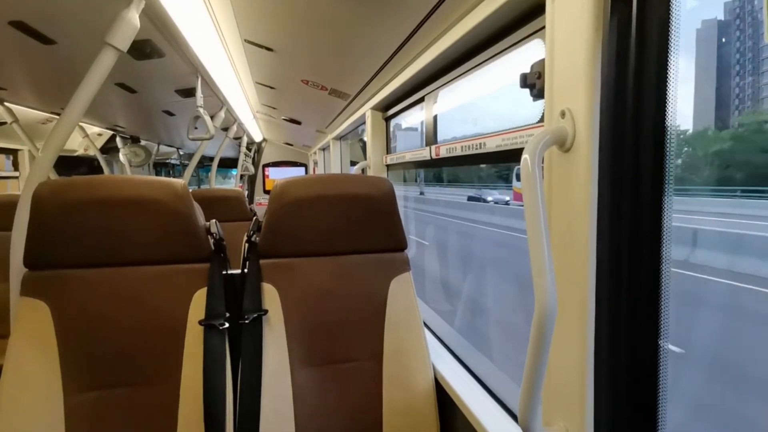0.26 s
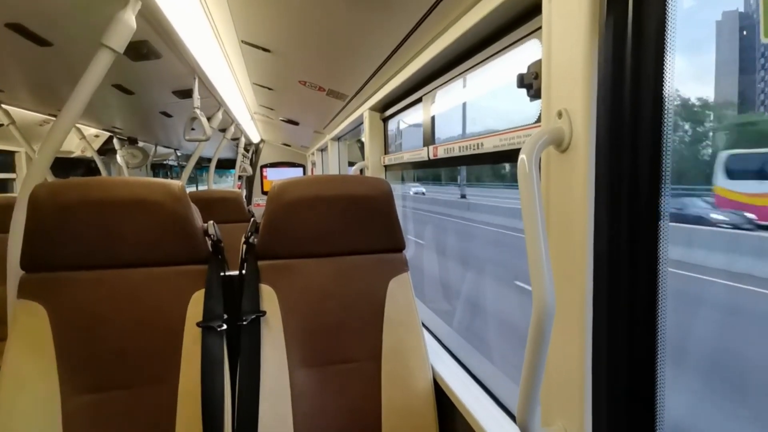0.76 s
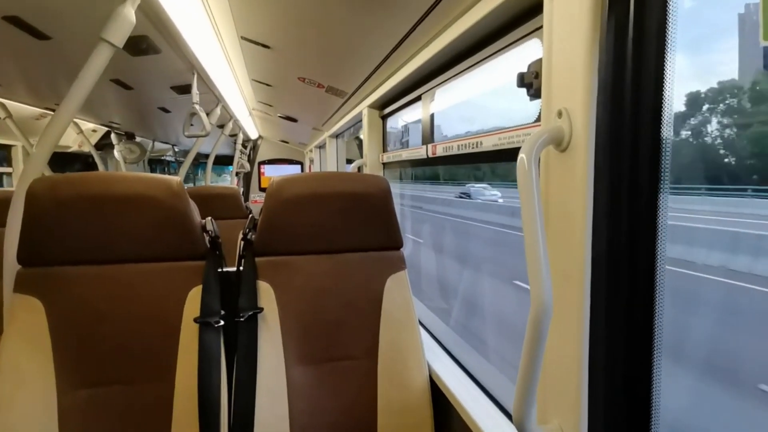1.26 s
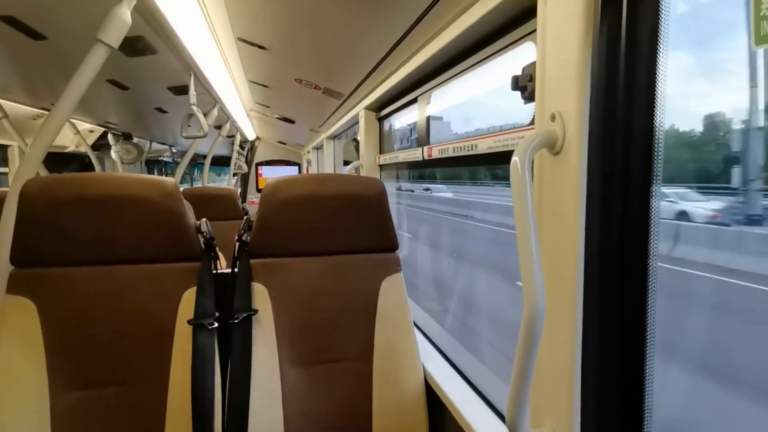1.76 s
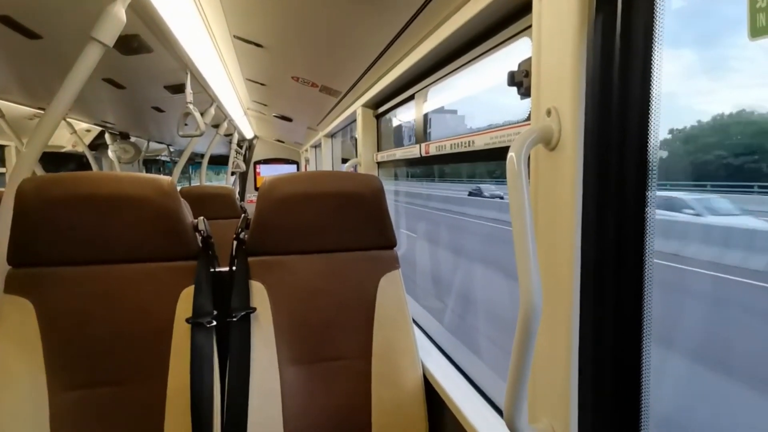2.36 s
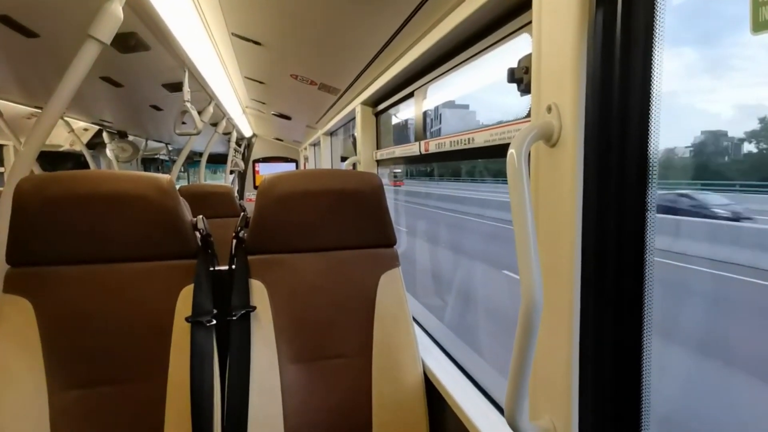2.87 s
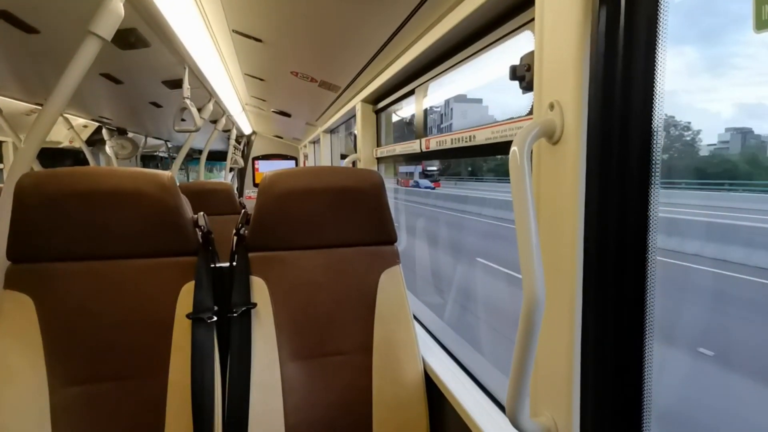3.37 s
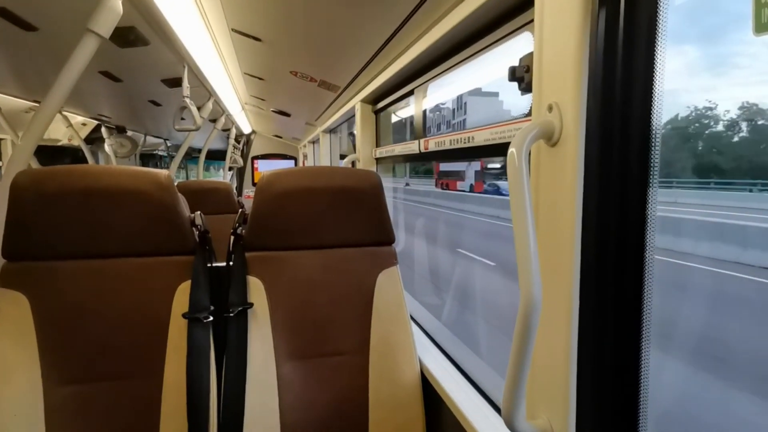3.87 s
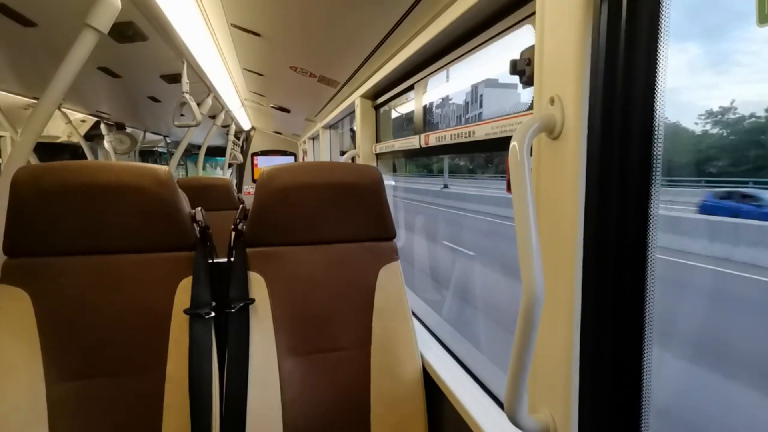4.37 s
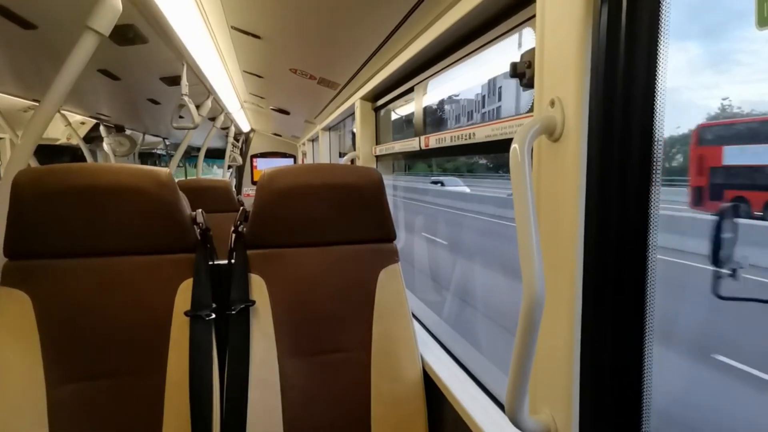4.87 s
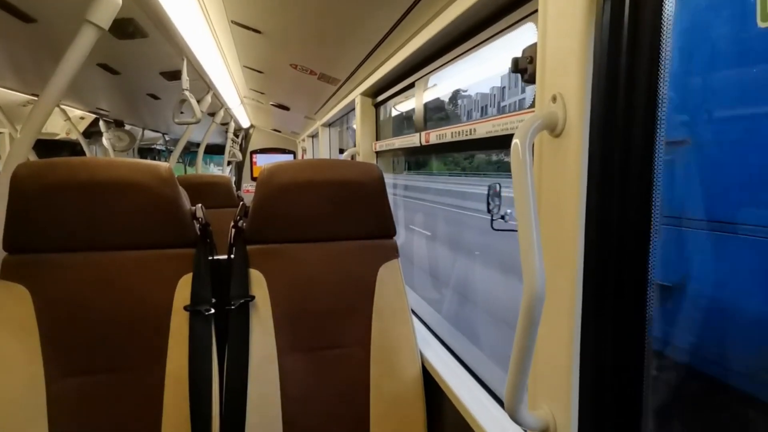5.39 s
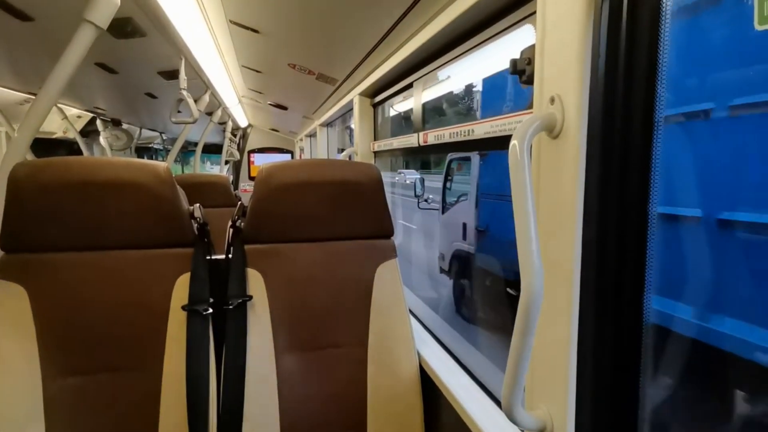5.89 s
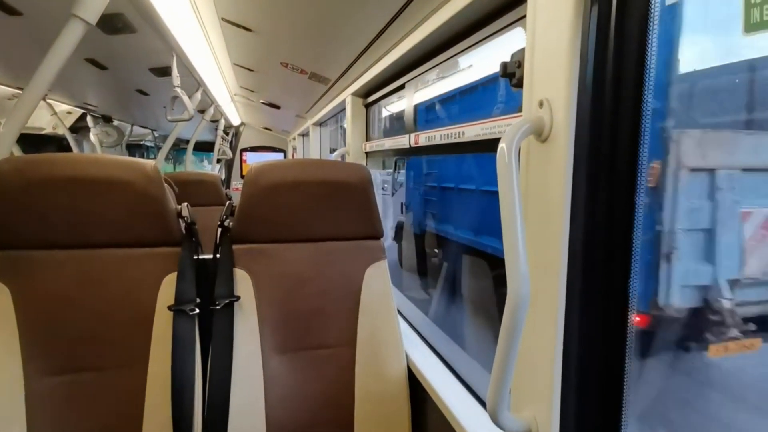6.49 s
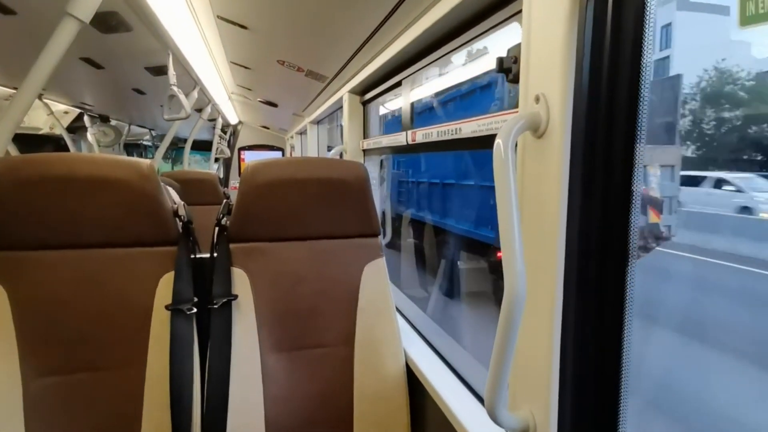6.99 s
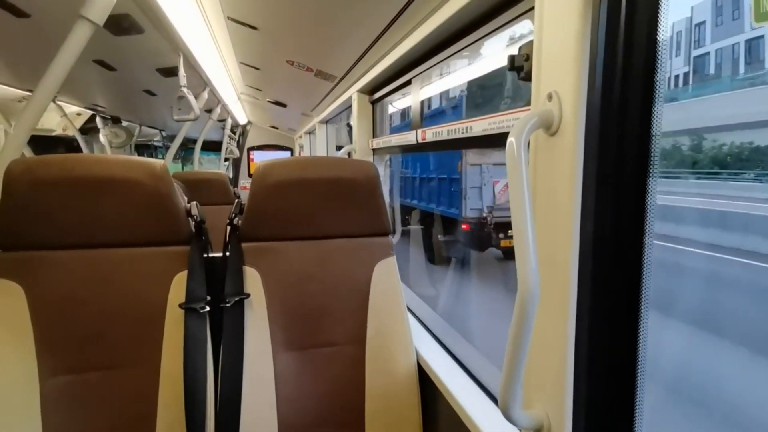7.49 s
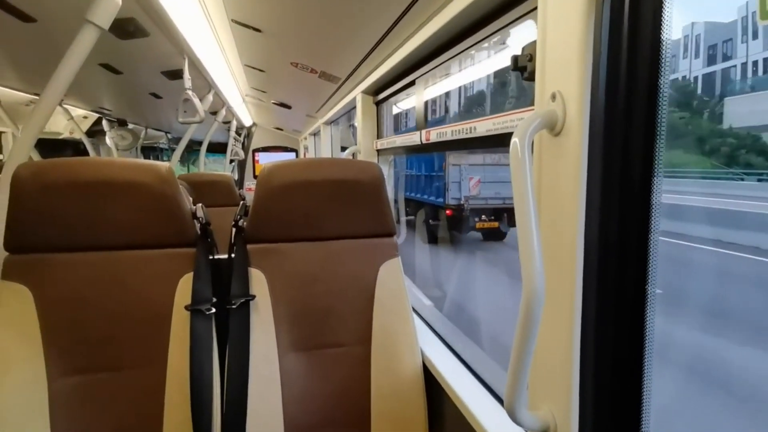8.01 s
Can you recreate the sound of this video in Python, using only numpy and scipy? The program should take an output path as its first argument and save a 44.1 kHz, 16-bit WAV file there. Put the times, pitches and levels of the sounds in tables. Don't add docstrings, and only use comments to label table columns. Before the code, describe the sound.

Heard from the rear seats of a motorway bus, a six-cylinder diesel drones deeply through the floor. It eases off before two seconds, its boom thinning towards the middle, then returns strongly. Thin gear-like whine and a faint high whistle sit over tyre rumble, cabin roar and fan hiss. Road noise grows as a lorry draws level and releases a brief burst of air.

```python
import sys
import numpy as np
from scipy import signal
from scipy.fft import rfft, irfft, next_fast_len
from scipy.io import wavfile

SR = 44100
rng = np.random.default_rng(int(sys.argv[2]) if len(sys.argv) > 2 else 0)


def nominal_scale(level):
    x = np.asarray(level, float) / 20
    return 10 ** x


def transcribe(signal):
    frames = np.atleast_2d(signal).T
    limited = np.clip(frames, -1, 1)
    pcm = np.round(limited * 32767).astype(np.int16)
    wavfile.write(sys.argv[1], SR, pcm)


N = 363825


def rms_one(x):
    return x / np.sqrt(np.mean(x ** 2) + 1e-20)


def seconds():
    return np.arange(N) / SR


def in_time(rows):
    s, *columns = np.transpose(rows)
    return [np.interp(seconds(), s, c) for c in columns]


def at_hz(points, hz, axis=1):
    points = np.array(points)
    return np.interp(np.log(hz), np.log(points[:, 0]), points[:, axis])


def bump(s, width):
    return np.exp(-((seconds() - s) / width) ** 2)


def drift(rate):
    r = np.exp(-80 * np.pi * rate / SR)
    slow = signal.lfilter([1], [1, -2 * r, r * r], rng.standard_normal(N // 40 + 2002))
    slow = slow[2000:]
    return np.interp(np.arange(N) / 40, np.arange(len(slow)), rms_one(slow - slow.mean()))


def sides(pan_db):
    return nominal_scale(np.multiply.outer([.5, -.5], pan_db))


# frequency in Hz, likeness of the sides 0-1, left minus right in dB, lead of the right in radians.
PORTS = [(20, .99, 10, 0.9), (40, .99, 1, 0.26), (83.6, 0.7, 6.5, 0.44), (129, 0.97, 5.5, 0.54),
         (166, 1, -8.5, 0.77), (284, 0.28, 2, 1.15), (373, 0.55, 1.5, 0.56), (500, 0.75, 3, 0.086),
         (724, 0.21, 1.5, .1), (966, 0.14, -4.5, 1.7), (1156, 0.52, 0, 4.26), (2070, 0.23, 0.5, 3.9),
         (2520, 0.33, 0.5, 6.26), (3900, 0.07, -2, 9.8), (6180, 0.5, -2, 13.5), (7230, 0.27, 5, 18.5),
         (12400, 0, 0, 22.2)]


def ports(hz):
    alike = np.clip(at_hz(PORTS, hz, axis=1), 0, 1)
    return alike, sides(at_hz(PORTS, hz, axis=2)), at_hz(PORTS, hz, axis=3)


# time in seconds, four-stroke cycles per second.
SPEED = [(0.0, 10.868), (1.03, 11.068), (2.06, 11.26), (3.09, 11.443), (4.12, 11.619), (5.16, 11.789),
         (6.19, 11.952), (7.22, 12.111), (8.25, 12.265)]


def engine_speed():
    hz, = in_time(SPEED)
    return hz, np.cumsum(hz) / SR


# time in seconds, level in dB.
RUSH = [(0, -37), (1.3, -37), (2.2, -37), (3, -35.5), (3.5, -33.5), (4.2, -34), (4.8, -32), (5.3, -31.5),
        (5.8, -30.5), (6.8, -29.5), (8.25, -28)]


def rush():
    rush_db, = in_time(RUSH)
    return rush_db


def follow(rush_db, mean_db, share, loaded_db=0):
    lift_s, lift_takes_s = 1.71, .22
    loaded = np.clip(1 - (seconds() - lift_s) / lift_takes_s, 0, 1)
    return mean_db + share * (rush_db - rush_db.mean()) + loaded_db * loaded


# time in seconds, firing thrust in dB, rocking on the mounts in dB.
SHAKE = [(0, -15, -26.5), (.8, -17.5, -18), (1.2, -17.5, -25.5), (2, -22, -22), (2.9, -22, -24.5),
         (3.5, -25.5, -36.5), (4.1, -27, -28.5), (4.6, -32, -32), (5, -36, -45), (5.6, -35, -31),
         (6.1, -27.5, -38), (6.6, -19.7, -33), (7.2, -19, -25), (7.7, -20.5, -22.5), (8.25, -19, -17.5)]
# time in seconds, change in dB.
SWELLS = [
    (1.25, 2.5),
    (3.6, -11),
    (5.4, -2.5),
]
# multiple of the cycle rate, level in dB,
# share of the firing and exhaust level followed, share of the rush level followed.
ORDERS = [(3, -51, -0.52, -3), (5, -34.5, 0.29, 0.3), (8, -37, -0.47, 1.5), (10, -36, 0.045, 1.1),
          (11, -30.5, 0.026, 0.25), (13, -34.5, 0.43, -1.45), (14, -38.5, -0.083, 1.67),
          (15, -37.5, 0.46, -0.1), (16, -38, 0.08, 1.87), (17, -43, -0.52, 0.1), (18, -35, 0.63, -0.04),
          (19, -49, 0.057, 0.9), (20, -39, 0.18, 1), (21, -62, 0.98, -1), (24, -43.5, 0.95, -0.1),
          (27, -49.5, 0.48, -0.1), (29, -52, 0.09, 1.6), (30, -44, 0.81, .5), (31, -46, 0.47, 0.2),
          (33, -47.5, -0.065, 0.2), (36, -44.5, 0.26, 0.04), (39, -48, -0.29, 1.78),
          (40, -51.5, 0.091, 1.5), (42, -50.5, 0.56, 1.5)]


def engine_levels(rush_db):
    firing_db, rocking_db = in_time(SHAKE)
    exhaust_db = follow(rush_db, -25.5, 1.42, 15.2)
    exhaust_db = exhaust_db + sum(db * bump(s, width=.27) for s, db in SWELLS)
    rocking_change = rocking_db - rocking_db[0]
    lag_s = .6
    trailing_change = np.interp(seconds() - lag_s, seconds(), rocking_change)
    seventh_db = -23 + .48 * (trailing_change + rocking_change) / 2
    levels = {6: firing_db, 7: seventh_db, 9: rocking_db, 12: exhaust_db}
    load_change = (firing_db + exhaust_db) / 2 + 21.0
    rush_change = rush_db - rush_db.mean()
    for k, db, load, rev in ORDERS:
        levels[round(k)] = db + load * load_change + rev * rush_change + 0.73 * drift(4.6)
    return levels


def engine(cycles, hz, rush_db):
    crank_start = .82
    eased = np.interp(seconds(), (1.7, 2.3), [0, 1])
    pulling = np.interp(seconds(), (5.2, 5.6), [0, 1])
    out = 0
    for k, db in engine_levels(rush_db).items():
        offset = rng.random() if k > 18 else .93 + .55 * (k in (5, 8, 9, 10, 17))
        eased_shift = .3 * (k > 10 and k not in (15, 18)) + .3 * (k == 12)
        pulling_shift = {6: .27, 7: .14}.get(k, 0)
        offset = offset + eased * eased_shift + pulling * pulling_shift
        angle = 2 * np.pi * (k * (cycles + crank_start) + offset) + 0.2 * drift(1.1)
        _, pan, right_leads = ports(k * hz)
        lead = np.multiply.outer([-.5, .5], right_leads)
        level = np.sqrt(2) * nominal_scale(db + .8 * drift(4.2))
        out = out + level * pan / pan.mean(axis=0) * np.sin(angle + lead)
    return out


# multiple of the cycle rate, level in dB.
TEETH = [(150.3, -62), (200.4, -57), (300.6, -58), (350.7, -67), (401.0, -57), (432.3, -65), (451.0, -59),
         (501.3, -60), (551.5, -56), (601.4, -60)]
# frequency in Hz, width in Hz, level in dB, left minus right in dB.
FLARES = [(1700, 90, 0, -3), (2430, 60, 0, 2), (3510, 40, 0, 5), (3650, 50, 1, -6), (4440, 70, 0, 5),
          (4520, 36, 2, -7), (4740, 24, 1, -6), (4580, 14, -1, -5), (4865, 40, -3, -3),
          (5020, 90, -2.5, -7), (5200, 100, -8, 0), (5385, 40, 0, -2), (5950, 70, -5, -4), (6420, 70, 0, 0),
          (6530, 60, 5.5, -2), (6700, 130, 1, 0), (6870, 40, 2, 2), (7000, 90, -3, 0)]


def whine(cycles, hz, rush_db):
    out = 0
    for k, db in TEETH:
        coarse = k * hz[::64]
        power = .015
        for f, w, lift_db, pan_db in FLARES:
            resonance = 1 / (1 + (2 * (coarse - f) / w) ** 4)
            power = power + nominal_scale(lift_db) ** 2 * sides(pan_db)[:, None] ** 2 * resonance
        flare = np.repeat(np.sqrt(power), 64, axis=1)[:, :N]
        waver_db = 1.8 * drift(2.5) - 4.5 + np.array([4.2 * drift(8), 4.2 * drift(8)])
        angle = 2 * np.pi * (k * cycles + rng.random((2, 1))) + 0.57 * drift(8.1)
        out = out + np.sqrt(2) * nominal_scale(db) * flare * nominal_scale(waver_db) * np.sin(angle)
    return out * nominal_scale(follow(rush_db, 4.0, 0.68 * .8))


# time in seconds, frequency in Hz.
TURBO_PITCH = [(0, 11960), (.35, 11890), (.55, 11920), (.85, 12050), (1.35, 12000), (1.9, 12110),
               (2.2, 12140), (2.7, 12145), (3.1, 12270), (3.9, 12255), (4.8, 12330), (5.6, 12365),
               (6.7, 12425), (7.3, 12445), (8.25, 12510)]
# start in seconds, length in seconds, level in dB.
WHISTLES = [(.03, .08, -59), (.19, .26, -55), (.6, .12, -60), (.8, .33, -63), (1.26, .19, -57),
            (2.19, .5, -60), (3.09, .27, -58), (3.5, .5, -61), (4.3, .2, -60), (4.7, .1, -63),
            (5.33, .33, -60), (5.8, .5, -60), (6.5, .3, -63), (7.09, .2, -57), (7.91, .1, -58),
            (8.17, .1, -59)]


def turbo():
    hz, = in_time(TURBO_PITCH)
    t = seconds()
    edge_s, gain = .05, nominal_scale(-69.5)
    for s, length, db in WHISTLES:
        inside = np.minimum(t - s, s + length - t)
        gain = gain + nominal_scale(db) * np.clip(inside / edge_s + .5, 0, 1)
    angle = 2 * np.pi * np.cumsum(hz) / SR + .5 * drift(25)
    right_leads = np.array([[0], [1.2]])
    return 1.15 * gain * nominal_scale(2.0 * drift(12)) * np.sin(angle + right_leads)


# frequency in Hz, width in Hz, dB above the bed.
PANELS = [(241, 14, 4), (370, 30, 3), (470, 22, 7.5), (577, 26, 6), (790, 60, 3), (1645, 45, 3),
          (9300, 90, 3), (10750, 80, 3), (2450, 85, 7.5), (3230, 80, 7), (3635, 55, 10.5)]


def bed(spectrum, patchy_db, flicker_db):
    size = next_fast_len(N)
    hz = np.maximum(np.arange(size // 2 + 1) * SR / size, 1)
    inside = (hz > spectrum[0][0]) & (hz < spectrum[-1][0])
    db = at_hz(spectrum, hz)
    for f, w, lift_db in PANELS:
        db = db + lift_db / (1 + (2 * (hz - f) / w) ** 2)
    shared, own = rfft(rng.standard_normal((2, size)))
    alike, pan, right_leads = ports(hz)
    right = alike * shared * np.exp(1j * right_leads) + np.sqrt(1 - alike ** 2) * own
    pair = np.array([shared, right]) * pan * nominal_scale(db) * inside
    place = 1.5 * np.log2(hz / spectrum[0][0])
    out = 0
    for k in range(int(place[inside].max()) + 2):
        band = np.cos(np.pi / 2 * np.clip(place - k, -1, 1)) ** 2
        out = out + irfft(pair * band, size)[:, :N] * nominal_scale(patchy_db * drift(10.5))
    out = out * nominal_scale(flicker_db * drift(4.0))
    return out / np.sqrt(np.mean(out.mean(axis=0) ** 2))


# frequency in Hz, level in dB per Hz.
ROAD = [(12, -65), (24, 8), (36, 18), (44, 11), (52, -3)]
# time in seconds, change in dB.
BUFFETS = [
    (0, 4.5),
    (6.8, 4),
]


def road(rush_db):
    road_db = follow(rush_db, -35, 0.91) + sum(db * bump(s, width=.3) for s, db in BUFFETS)
    return nominal_scale(road_db) * bed(ROAD, patchy_db=6.0, flicker_db=6.0)


# frequency in Hz, level in dB per Hz.
RUMBLE = [(38, -20), (50, -5.5), (65, -6), (130, 4), (160, -5), (200, -11.5), (260, -13), (330, -18)]


def rumble(rush_db):
    return nominal_scale(follow(rush_db, -28, 0.72, 5.8)) * bed(RUMBLE, patchy_db=0.5, flicker_db=1.5)


def knock(cycles):
    return 1 + 0.056 * np.sin(2 * np.pi * 6 * cycles)


# frequency in Hz, level in dB per Hz.
ROAR = [(130, -6), (220, -8.5), (302, -12.5), (471, -4.5), (527, -12), (594, -10), (669, -16.5),
        (794, -14.5), (1100, -18.5), (1700, -30.5), (2210, -67), (3740, -120)]


def roar(cycles, rush_db):
    return nominal_scale(rush_db) * knock(cycles) * bed(ROAR, patchy_db=1.5, flicker_db=0.96)


# frequency in Hz, level in dB per Hz.
HISS = [(900, -3), (1400, 0), (2090, -3.5), (2950, -4), (3900, -4.5), (5200, -10.5), (6800, -4),
        (7700, -15), (9200, -8), (11700, -10.5), (13300, -14), (14200, -19), (15000, -15), (15750, -18)]


def hiss(cycles, rush_db):
    return nominal_scale(follow(rush_db, -44.06, .8)) * knock(cycles) * bed(HISS, patchy_db=1.32, flicker_db=0.39)


# start in seconds, hold in seconds, level in dB, low edge in Hz, high edge in Hz.
PUFFS = [(2.53, .04, -47.5, 6000, 15000), (6.43, .02, -48, 1500, 6500), (6.59, .13, -44, 5000, 12000),
         (6.79, .09, -45, 1800, 6800), (6.595, .14, -39.5, 2200, 4600), (3.85, .05, -33.5, 270, 430),
         (6.66, .05, -31, 360, 430), (.355, .006, -39, 400, 900), (6.61, .045, -43, 4120, 4320),
         (6.69, .08, -47, 3900, 4150), (6.595, .045, -49, 5480, 5700), (6.65, .12, -47, 5700, 6700),
         (6.68, .1, -46, 2350, 2700), (3.18, .06, -38, 430, 620), (4.8, .07, -37, 330, 450)]


def puffs():
    t, out = seconds(), 0
    white = rng.standard_normal((2, N))
    for s, length, db, low_hz, high_hz in PUFFS:
        rise = min(.011, length / 2)
        swell = np.clip((t - s) / rise, 0, 1)
        fade = np.exp(-np.maximum(t - s - rise - length, 0) / (rise + .25 * length))
        sos = signal.butter(2, [low_hz, high_hz], "band", fs=SR, output="sos")
        out = out + np.sqrt(2) * nominal_scale(db) * swell * fade * rms_one(signal.sosfilt(sos, white))
    return out * sides(-1.2)[:, None]


def scene():
    hz, cycles = engine_speed()
    rush_db = rush()
    tones = engine(cycles, hz, rush_db) + whine(cycles, hz, rush_db) + turbo()
    beds = road(rush_db) + rumble(rush_db) + roar(cycles, rush_db) + hiss(cycles, rush_db)
    return tones + beds + puffs()


def low_pass(x):
    return signal.sosfilt(signal.butter(12, 15610, fs=SR, output="sos"), x)


def record(dry):
    mix = 1.25 * np.tanh(dry / 1.138)
    return low_pass(mix)


dry = scene()
out = record(dry)
transcribe(out)
```